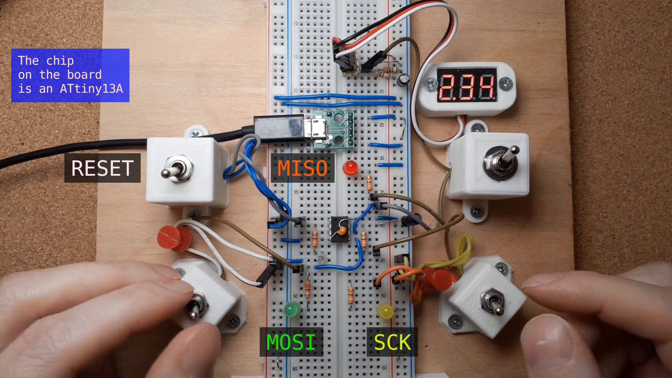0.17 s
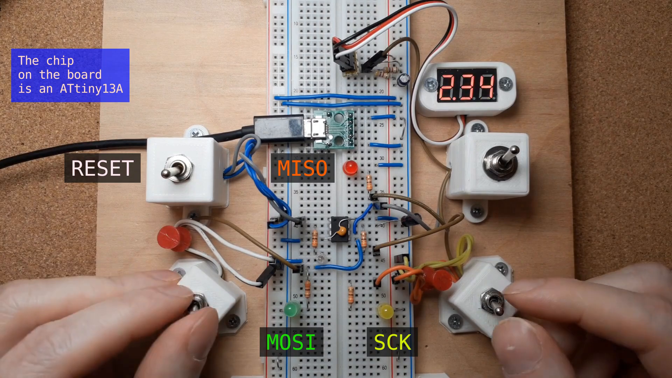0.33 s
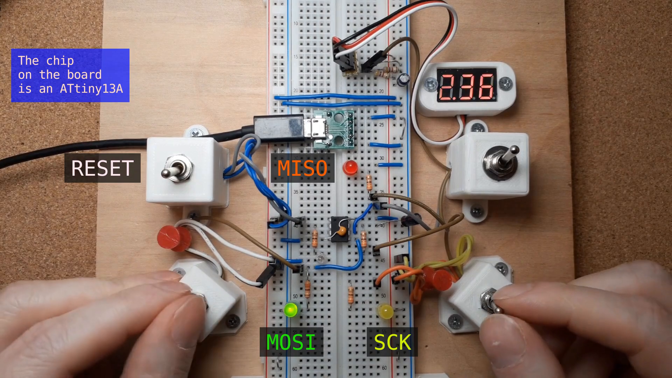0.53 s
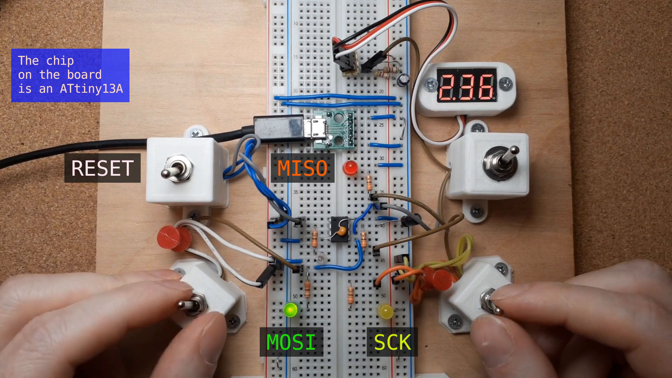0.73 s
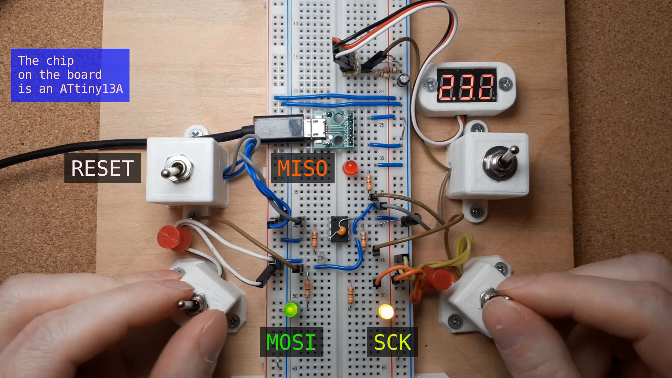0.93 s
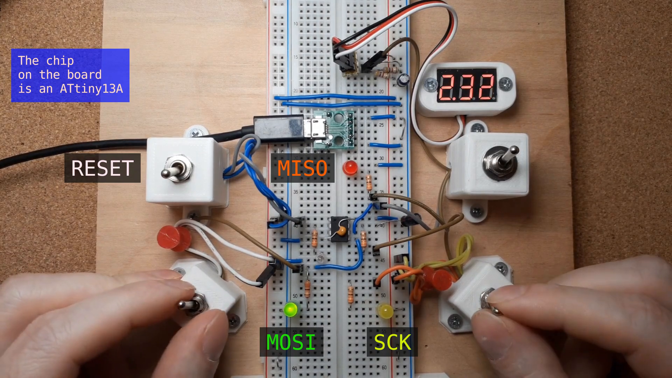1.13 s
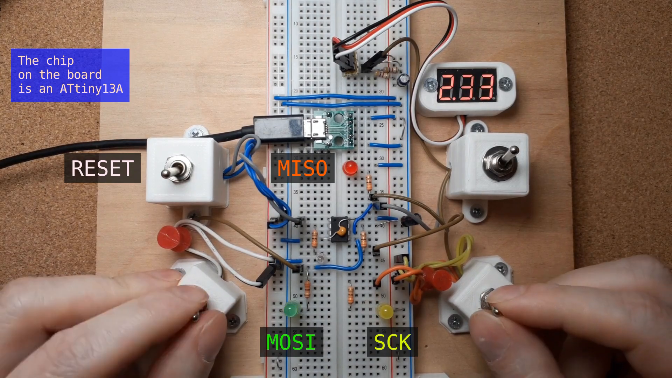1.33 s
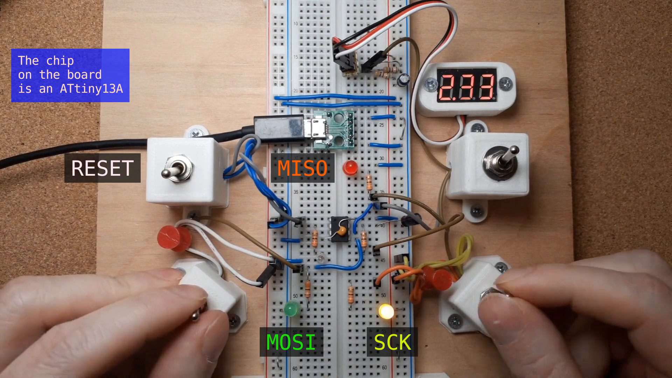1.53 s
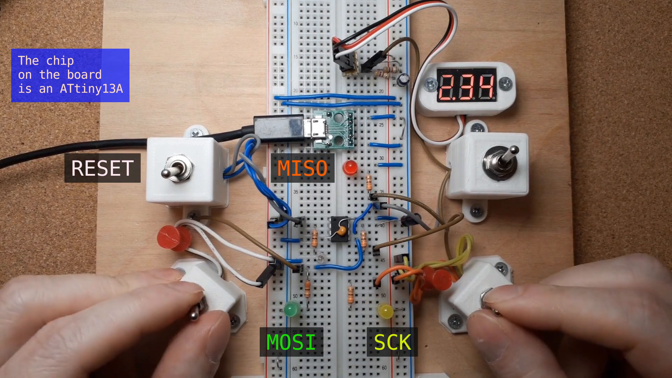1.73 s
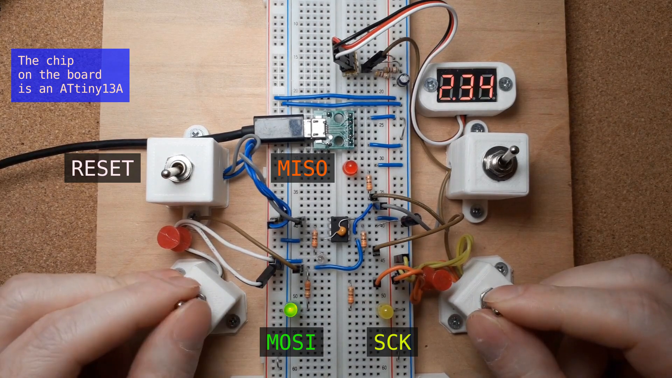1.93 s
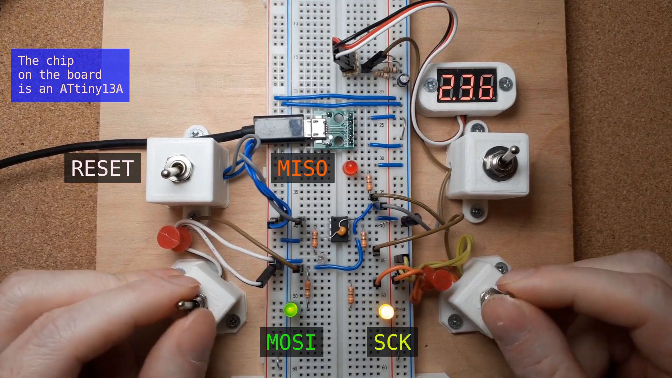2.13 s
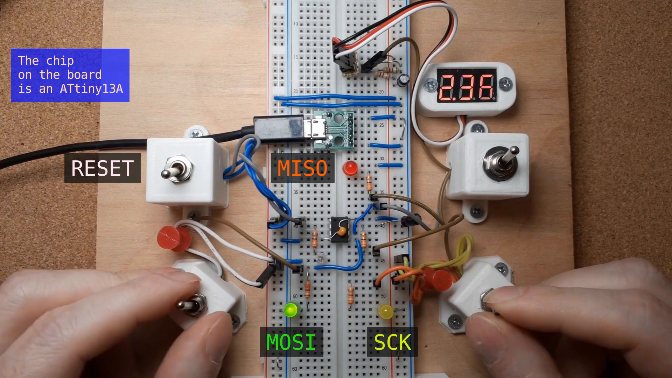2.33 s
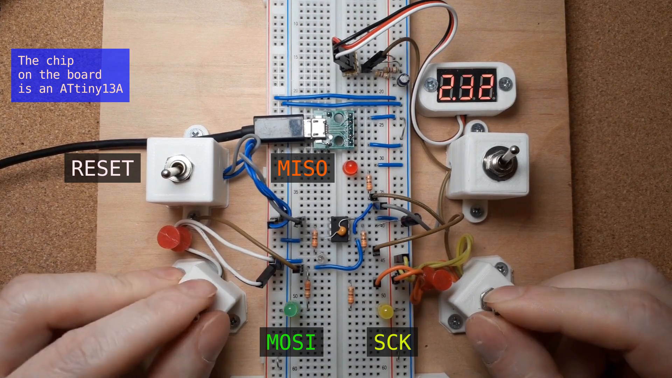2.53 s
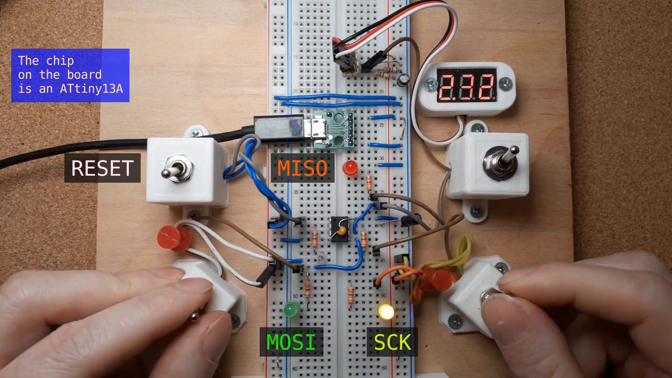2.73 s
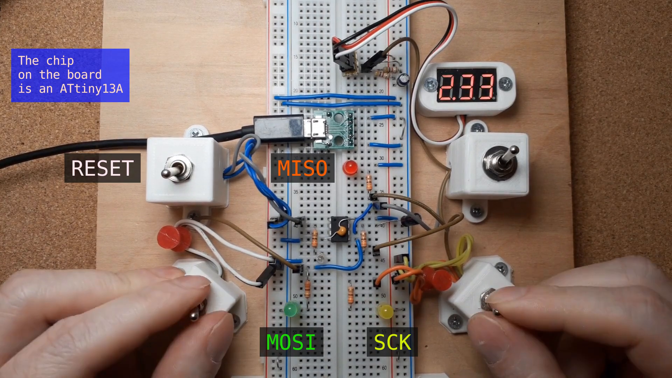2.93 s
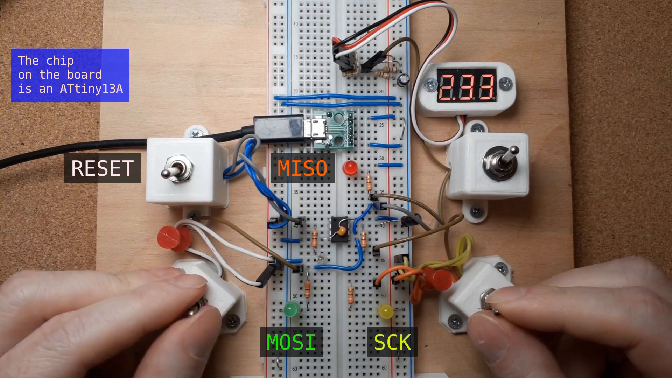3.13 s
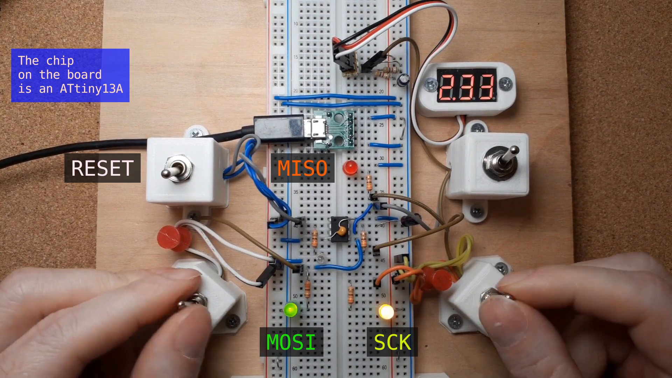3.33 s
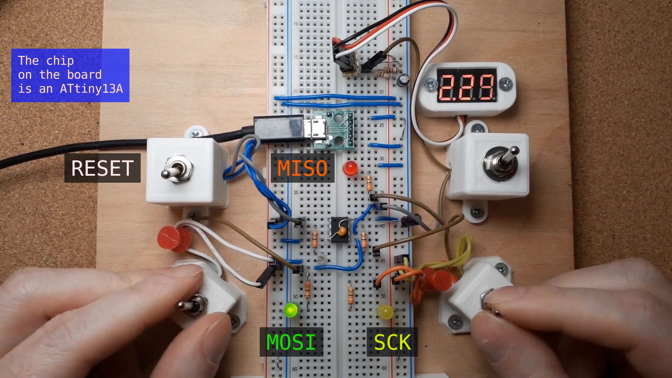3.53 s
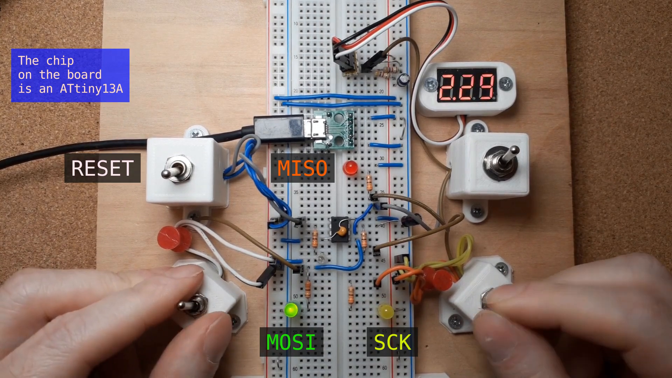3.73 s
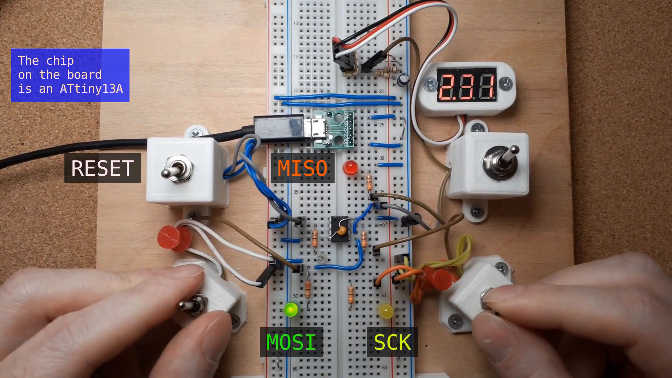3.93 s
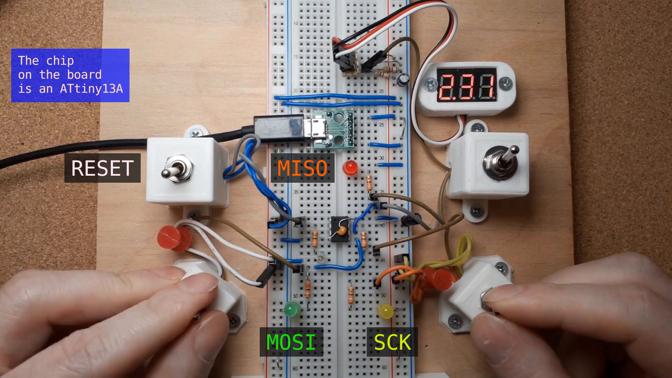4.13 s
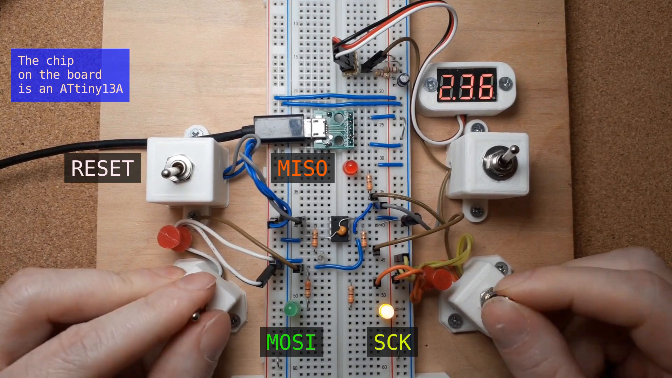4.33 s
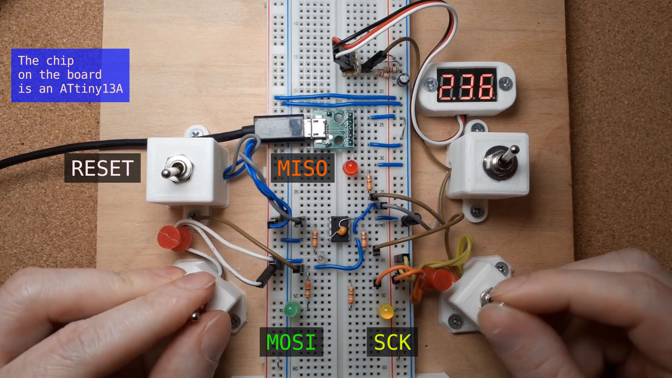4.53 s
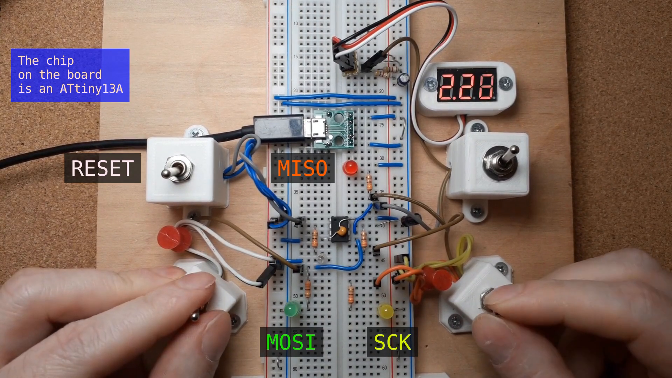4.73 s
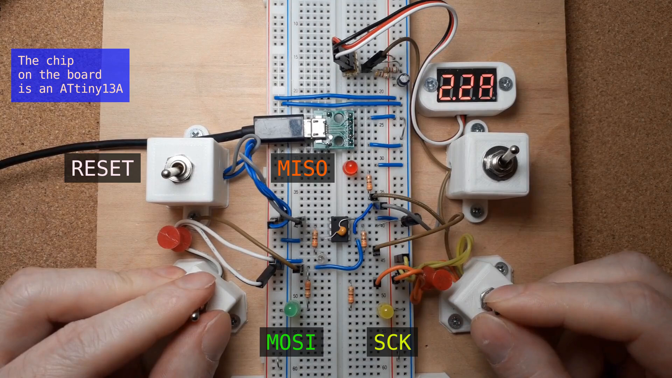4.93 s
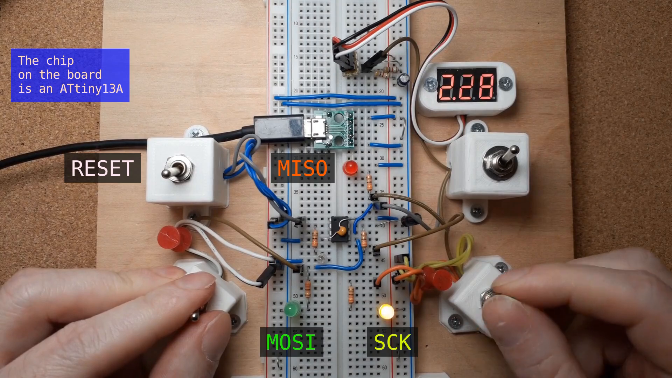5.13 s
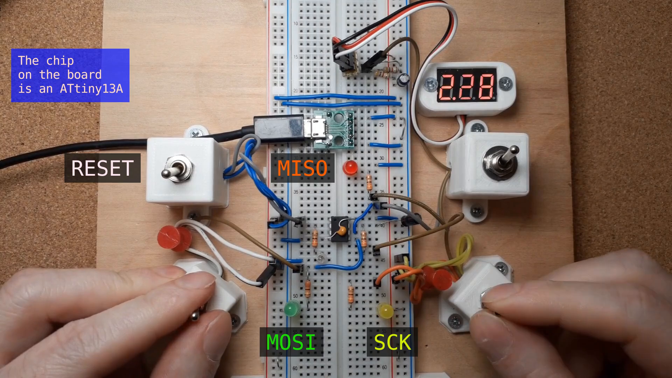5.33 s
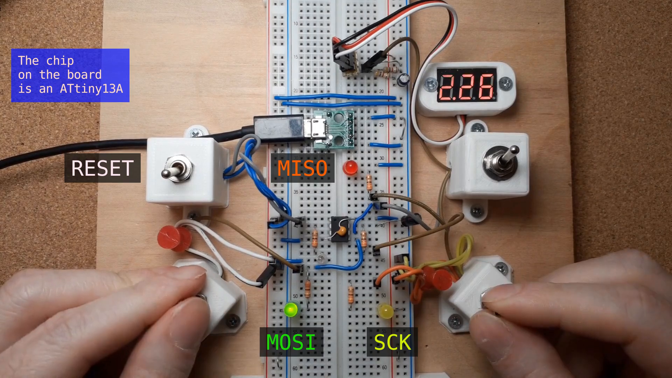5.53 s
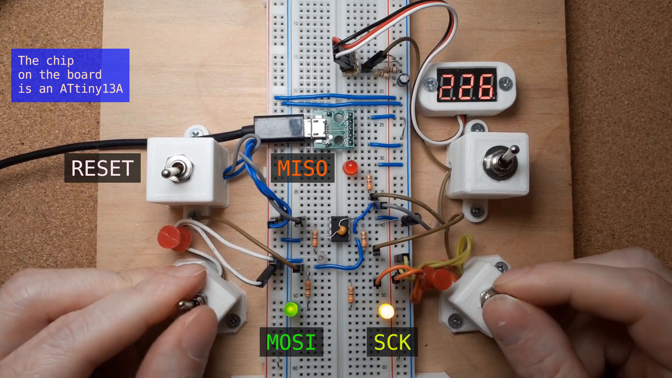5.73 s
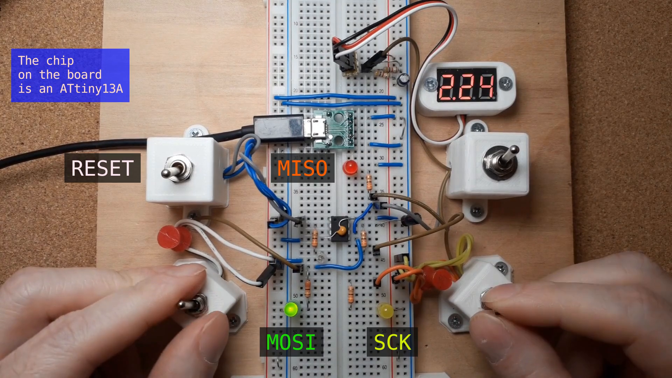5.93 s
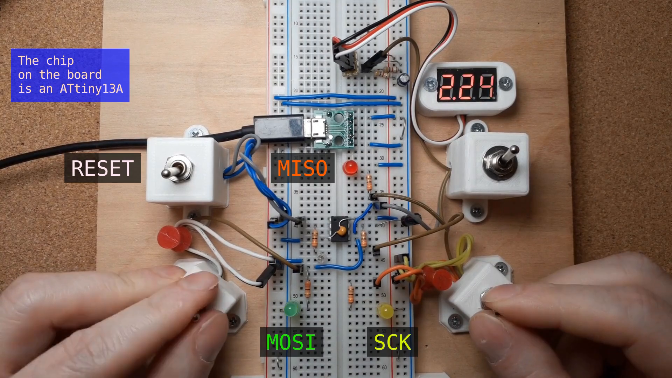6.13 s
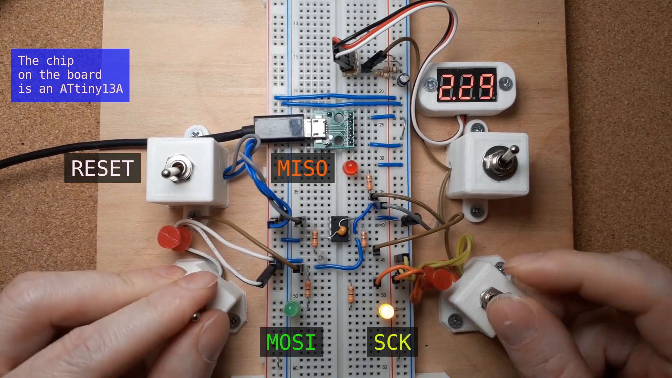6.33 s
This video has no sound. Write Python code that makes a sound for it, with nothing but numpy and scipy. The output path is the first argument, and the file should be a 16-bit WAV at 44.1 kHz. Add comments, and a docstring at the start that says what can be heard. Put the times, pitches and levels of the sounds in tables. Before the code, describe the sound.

Two small toggle switches flipped by hand in quick runs, with sharp close clicks, soft wooden thumps and faint finger rubs.

```python
"""Two small toggle switches in plastic boxes on a wooden board, close to a stereo microphone.
Hiss and a faint fan fade in, and a finger ticks and rubs on a lever. From 0.5 s the switches are flipped
in quick runs: each time the plunger scrapes, the contact snaps over and the lever hits its stop, then
box and springs ring, the board thumps, the bench sways and a small dry room answers. Fingers tick and
rub between the flips; the last flip lands at 6.2 s, and one short rub follows it."""
import sys
import numpy as np
from scipy import signal
from scipy.fft import rfft, irfft
from scipy.io import wavfile

SR = 44100
rng = np.random.default_rng(int(sys.argv[2]) if len(sys.argv) > 2 else 0)


def transcribe(signal):
    """Save signal, clipped to [-1, 1], as a 16-bit WAV file at the path in sys.argv[1]."""
    frames = np.atleast_2d(signal).T
    limited = np.clip(frames, -1, 1)
    pcm = np.round(limited * 32767).astype(np.int16)
    wavfile.write(sys.argv[1], SR, pcm)


N = 281799

# colour of the room tone: (frequency [Hz], relative level [dB])
HISS_COLOUR = [(30, 21.5), (100, 13), (250, 10.5), (500, 6.5), (1000, 3), (2000, -3), (5000, -7),
               (10000, -7), (16000, -11.5)]
# the fan's hum, as peaks in the room tone: (frequency [Hz], width [Hz], lift [dB])
FAN_HUM = [(122, 33, 21), (265, 36, 8), (324, 17, 10), (764, 40, 6.5), (1606, 64, 9.4)]
# the fan's whine: (frequency [Hz], level [dB])
FAN_WHINE = [(257, -72), (763, -80.5), (1604, -85.5)]
# length of the room's tail: (frequency [Hz], t60 [s])
ROOM_DECAY = [(80, 0.07), (200, 0.05), (400, 0.09), (1300, 0.135), (2200, 0.135), (5000, 0.1365),
              (14000, 0.08)]
# colour of the room's tail: (frequency [Hz], level [dB])
ROOM_COLOUR = [(80, -6.5), (200, -12), (400, -8.5), (1300, -21), (2200, -21), (5000, -22.5), (11000, -18.5),
               (15000, -18.5)]
# rumble of the hands on the board: (frequency [Hz], relative level [dB])
HAND_RUMBLE = [(20, 0.5), (40, 0.5), (85, 0), (130, -12), (250, -26), (700, -45.5)]
# colour of sliding skin: (frequency [Hz], relative level [dB])
SKIN_COLOUR = [(100, -10.5), (300, -2), (800, -1.5), (1400, 3), (2500, -2.5), (5000, -9.5), (9000, -17),
               (15000, -27)]
# skin rubs over lever and box: (centre time [s], half length [s], level [dB], softness [dB/octave])
RUBS = [(.168, 0.0026, -66.5, 0), (0.296, 0.012, -53.5, 11), (0.802, 0.12, -66, 4), (0.891, 0.042, -53, 3),
        (2.895, 0.12, -65.5, 2), (3.221, .016, -52.5, -3), (3.386, 0.024, -52, 4), (3.773, 0.017, -47, 4.5),
        (6.38, 0.0096, -47, -2.5)]
# EQ that turns a full flip into a light tick: (frequency [Hz], gain [dB])
TICK_EQ = [(150, 6.5), (400, 6), (900, 4.5), (2000, -1), (4500, -3.5), (9000, -6.5), (15000, -11.5)]
# a finger lands on a lever and takes up its play: (time [s], gain [dB], softness [dB/octave])
LANDINGS = [(.402, -32.5, -1.5), (0.438, -38, -1), (0.4702, -20, -2.5), (0.6823, -46.5, 6.5),
            (.9103, -28.5, -1), (1.028, -38, 3.5), (1.3112, -38.5, 0.5), (1.572, -40.5, 5.5),
            (1.9912, -26, 0.5), (2.1747, -35, 2), (2.2796, -37, 2.5), (2.52, -37.5, 0),
            (2.7483, -36.5, 1.5), (3.0998, -32.5, 2), (3.2111, -23.5, 1), (3.4931, -20.5, 3.5),
            (3.6608, -29.5, -2.5), (4.064, -30.5, 0.5), (4.4246, -33.5, -0.5), (4.7386, -32, -1.5),
            (5.1221, -28, -1.5), (5.2589, -31, -2.5), (5.5441, -34.5, 4), (5.564, -29.5, -1),
            (5.8887, -30, 0.5), (6.18, -34, 0)]
# the rocker catches on its way to "on", rows left, right: (lead [s], gain [dB], softness [dB/octave])
ROCKER_CATCHES = [(.008, -14.5, -1), (.02, -32, 0.5)]
# the board's bounce, rows left on, left off, right on, right off:
# (mid pitch [Hz], rise [s], pitch drop [share of mid pitch], delay [s])
BOARD_BOUNCES = [(121, 0.004, 0.52, 0.0012), (141, .0028, .9, 0.00081), (101, 0.0037, 0.31, 0.0013),
                 (109, 0.0041, 0.39, .0008)]
# where the board's hollow knock sits: (frequency [Hz], weight of the knock gain [factor])
KNOCK_BAND = [(400, 1.5), (1600, 0)]
# ring of springs and metal frames: (frequency [Hz], half width [Hz], gain [dB], t60 [s])
SPRING_MODES = [(4300, 500, -26, .09), (6960, 450, -23.5, .1), (11200, 700, -17, 0.1)]
# resonances of each switch in its box: (frequency [Hz], undamped width [Hz], lift [dB])
LEFT_BOX = [(850, 420, 9.5), (1360, 130.0, 3.5), (2536, 410.0, -1.5), (2800, 76, -1.5), (3120, 260, 4.5),
            (3500, 210, 0.5), (4150, 520, 8), (4830, 500, 5), (5920, 390, 3), (6300, 1100, 4),
            (7430, 200.0, 2), (7900, 150, 2.5), (9640, 410, 4.5), (11433, 2100, 5), (12992, 310.0, 0.8),
            (14000, 320.0, 3)]
RIGHT_BOX = [(858, 200, 6), (1151, 88, 11.4), (1390, 160, 4.4), (1800, 210, 8.7), (2150, 450, 5.94),
             (2420, 170, 8.7), (3350, 400, 11.46), (4090, 360, 6.8), (5500, 150, 2.0), (6200, 560, 2.5),
             (6970, 480, 3.4), (9900, 300, 2.4), (11000, 980, 5.4), (15200, 1380.0, 11)]
# stereo placement: (frequency [Hz], left switch L-R [dB], right switch L-R [dB])
SWITCH_PAN = [(300, 5.5, -5), (1490, 2, -1), (3500, -1.5, 1.5), (7000, 7.5, -4.5), (14000, 3.5, -2)]
# colour of each throw: (frequency [Hz], left on [dB], left off [dB], right on [dB], right off [dB])
THROW_COLOURS = [(197, 21.5, 20, 13.5, 15), (352, 7, 15.5, -2, 7.5), (526, 3, 2.5, -2, 4),
                 (1035, 5, 6, -5, -8), (1340, 13, 18.0, 6.5, 7), (2200.0, 7, 14.5, 4, 1),
                 (3530, 9.5, 10, 2, -2.5), (5340, 8.5, 9.5, 8.5, 3), (7680, 5.5, 14, 11, 10.5),
                 (9560, -0.3, -0.5, 1.5, 1), (12100, 0.15, 6, 4.5, 4), (15500.0, -4.5, 4.5, -6.5, -7.5)]
# cue list of flips: (time [s], switch [0 left, 1 right], throw [0 on, 1 off], snap to stop [ms],
# stop over snap in the metal [dB], click gain [dB], brightness [dB/octave], ringing pitch [Hz],
# knock gain [dB], thump level [dB])
FLIP_CUES = [(0.5187, 0, 0, 2.73, 3, -1.5, 0.04, 3170, -3, -23),
             (0.9466, 1, 0, 2.22, -2.5, -3, 0.5, 1660, 3.5, -21.5),
             (1.1056, 1, 1, 3.32, 3.5, -4.5, .2, 1720, -2, -20),
             (1.423, 0, 1, 1, 13.5, -0.8, 1.5, 1772, 1.5, -22.5),
             (1.6056, 1, 0, 2.65, 1.5, -4, .6, 2220, 3.5, -21.5),
             (1.7554, 1, 1, 2.82, -2, -2.5, 0.16, 1510, 0, -19),
             (2.03, 0, 0, 1.99, 11, -1.1, 1.5, 2280, 6, -24.5),
             (2.2161, 1, 0, 3.2, -17.5, -1.5, 0, 1750, -1, -24),
             (2.3376, 1, 1, 1.13, 2, 1.35, .6, 1950, -1, -24),
             (2.5995, 0, 1, 0.38, -4.5, -0.75, 0.5, 3770, 0, -27),
             (2.79, 1, 0, 0.75, 16, 4.5, -1.54, 4270, -9.5, -24),
             (2.9538, 1, 1, 1.06, 2, 4.5, -1.53, 2670, -5.5, -23),
             (3.2484, 0, 0, 2.62, -1.5, -1.5, -0.1, 2662, -1, -19.5),
             (3.4204, 1, 0, 2.6, -1, -5.5, 1.8, 2020, 9, -21.5),
             (3.5366, 1, 1, 1.83, -2.5, -1.6, 1, 1270, 0.5, -20.5),
             (3.698, 1, 0, 3.16, -8, -6, 1, 3960, 5, -25.5),
             (3.8268, 1, 1, 3.2, 4, -3.5, 0.8, 1790, 4.5, -17.5),
             (4.14, 0, 1, 1.4, -1.5, 0.85, -0.24, 1566, -4.5, -24),
             (4.341, 1, 0, .97, -19.5, -0.55, 1, 1830, 7, -23),
             (4.474, 1, 1, 2.94, -26.5, -1.4, 0.6, 1660, 2, -18.5),
             (4.6352, 1, 0, 3, -38, -0.5, 1.1, 1890, 0, -24),
             (4.7837, 1, 1, 3.24, 3, -1.3, -0.5, 1507, .5, -17),
             (5.1619, 1, 0, 1.29, 0, 4.5, -0.56, 2406, -4.5, -23.5),
             (5.301, 1, 1, 2.86, 0, -2.5, -0.1, 3020, 1.5, -19),
             (5.6085, 0, 0, 2.6, 13.5, 0.3, 1, 1220, 2, -18),
             (5.7931, 1, 0, 0.96, -22.5, 2.5, 1.44, 1884, 4, -24),
             (5.9602, 1, 1, 1.55, -1.5, -2.1, 0.06, 3487, -1, -22),
             (6.2176, 0, 1, 0.84, 0, 0, -0.25, 1240, -2.5, -23.5)]
# master fader: (time [s], gain [dB])
FADER = [(0, -10.5), (.2, -1.5), (.45, 0.5)]

CLICK_SAMPLES, PREROLL_SAMPLES = 4096, 256
PREROLL_S = PREROLL_SAMPLES / SR
CLICK_HZ, SCENE_HZ = np.fft.rfftfreq(CLICK_SAMPLES, 1 / SR), np.fft.rfftfreq(N, 1 / SR)
TIME_S = np.arange(N) / SR
LEFT_VS_RIGHT = np.array([[1], [-1]])


def amp(db):
    """Decibels as a gain factor."""
    return 10 ** (np.asarray(db) / 20)


def unit_rms(x):
    """The signal brought to an RMS of one."""
    return x / np.sqrt(np.mean(x ** 2) + 1e-20)


def contour(table, hz, column=1):
    """One column of a table, drawn along a log-frequency axis."""
    columns = np.transpose(table)
    return np.interp(np.log(hz + 1), np.log(columns[0] + 1), columns[column])


def peaks(modes, hz):
    """Lift in dB from a set of resonances."""
    return sum(db / (1 + (2 * (hz - f) / width) ** 2) for f, width, db in modes)


def octaves(hz, pivot_hz):
    """Octaves from the pivot of a tilt EQ, held flat in the bass."""
    return np.log2(np.maximum(hz, 250) / pivot_hz)


def minimum_phase(db):
    """An EQ that rings only after the blow."""
    log_gain = np.log(amp(np.r_[db, db[-2:0:-1]]))
    return np.exp(np.conj(signal.hilbert(log_gain))[:len(db)])


def add(mix, s, sound):
    """Lay a sound into the mix at s seconds."""
    part = mix[:, max(round(s * SR), 0):][:, :sound.shape[-1]]
    part += sound[..., :part.shape[1]]


def noise(colour_db, shared):
    """Coloured stereo noise, with a share of its power common to both sides."""
    centre, *sides = rng.standard_normal((3, N))
    white = shared ** .5 * centre + (1 - shared) ** .5 * np.array(sides)
    return unit_rms(irfft(rfft(white) * amp(colour_db), N))


def drift(cutoff_hz):
    """A slow random wobble."""
    return unit_rms(irfft(rfft(rng.standard_normal(N)) * np.exp(-(SCENE_HZ / cutoff_hz) ** 2), N))


def room_tone(hiss_db=-63.5):
    """Microphone hiss and a faint fan, whose speed wavers a little."""
    fan_s = np.cumsum(1 + 0.0024 * drift(cutoff_hz=5)) / SR
    whine = sum(amp(db) * np.sin(2 * np.pi * (hz * fan_s + 0.17 * rng.random((2, 1))))
                for hz, db in FAN_WHINE)
    colour_db = contour(HISS_COLOUR, SCENE_HZ) + peaks(FAN_HUM, SCENE_HZ)
    return amp(hiss_db) * noise(colour_db, shared=0.12) + whine


def room_reverb(send, predelay_s=0.0056):
    """Dense echoes from the bench and near walls, each band dying at its own speed."""
    hz, t, bands = signal.stft(rng.standard_normal((2, SR // 2)), SR, nperseg=256)
    t60 = contour(ROOM_DECAY, hz)[:, None]
    gain = amp(contour(ROOM_COLOUR, hz)[:, None]) * np.sqrt(2 * np.log(1000) / t60 / SR)
    tail = signal.istft(bands * gain * amp(-60 * t / t60), SR, nperseg=256)[1]
    tail = np.pad(tail, ((0, 0), (round(predelay_s * SR), 0)))
    return signal.fftconvolve(send, tail, axes=1)[:, :N]


def flip_envelope(levels_db, build_s, decay_s):
    """An envelope that swells into each flip and dies away after it."""
    t = TIME_S[::64]
    since = t - np.array(FLIP_CUES)[:, :1]
    swells = amp(levels_db) * np.exp(-abs(since) / np.where(since < 0, build_s, decay_s))
    return np.interp(TIME_S, t, np.sqrt(np.sum(swells ** 2, 0)))


def bench_sway(pitch_hz=21.1, db=-32.5):
    """Every flip feeds the sub-bass sway of the bench."""
    cycles = np.cumsum(pitch_hz * (1 + 0.064 * drift(cutoff_hz=6))) / SR + .025 * LEFT_VS_RIGHT
    return flip_envelope(db, build_s=0.03, decay_s=0.46) * np.sin(2 * np.pi * cycles)


def hand_tremble(rest_db=-63.5, settle_s=0.53, over_thump_db=-22.5):
    """Hands rumble as they rest on the board, and tremble most around a heavy thump."""
    resting = amp(rest_db) * np.minimum(TIME_S / settle_s, 1) ** 2
    thumps_db = np.array(FLIP_CUES)[:, -1:]
    pressing = flip_envelope(thumps_db + over_thump_db, build_s=0.054, decay_s=.08)
    return np.hypot(resting, pressing) * noise(contour(HAND_RUMBLE, SCENE_HZ), shared=0.76)


def skin_rub(mix, s, half_s, db, soft_db, catches_per_s=900, catch_decay_s=0.0018):
    """Skin slips in tiny random catches, swelling and fading around s."""
    count = 2 ** 14
    hz, t = np.fft.rfftfreq(count, 1 / SR), (np.arange(count) - count // 2) / SR
    catches = rng.random(count) < catches_per_s / SR
    strength = amp(2.7 * np.minimum(rng.exponential(1, count), 4))
    power = signal.lfilter([1], [1, -np.exp(-1 / (catch_decay_s * SR))], (catches * strength) ** 2)
    grain = np.sqrt(power) * rng.standard_normal((2, count))
    colour_db = contour(SKIN_COLOUR, hz) - soft_db * octaves(hz, pivot_hz=2000)
    friction = unit_rms(irfft(rfft(grain) * amp(colour_db)))
    add(mix, s + t[0], amp(db) * np.exp(-(t / half_s) ** 2) * friction)


def lever_tick(mix, s, switch, db, soft_db):
    """One light blow rings the switch; a soft fingertip sounds darker than a nail."""
    average_db = np.mean([contour(THROW_COLOURS, CLICK_HZ, column) for column in range(1, 5)], 0)
    colour_db = db + average_db + contour(TICK_EQ, CLICK_HZ) - soft_db * octaves(CLICK_HZ, pivot_hz=2000)
    grain = rng.standard_normal((2, CLICK_SAMPLES))
    add(mix, s - PREROLL_S, switch_click(switch, grain, [(0.0031, 0)], colour_db))


def fingers(press_s=0.044, slip_delay_s=0.0035):
    """A finger lands on the next lever, slips and presses; going to "on", the rocker catches once."""
    mix = np.zeros((2, N))
    for s, switch, throw, *_ in FLIP_CUES:
        # two faint ticks under the pressing finger
        for lead, accent in zip(rng.random(size=2), rng.standard_normal(size=2)):
            lever_tick(mix, s - press_s * lead, switch, db=-44.5 + 2 * accent, soft_db=2.5)
        if throw == 0:
            lead_s, db, soft_db = ROCKER_CATCHES[switch]
            lever_tick(mix, s - lead_s, switch, db, soft_db)
    for s, db, soft_db in LANDINGS:
        switch = next(side for flip_s, side, *_ in FLIP_CUES if flip_s > s)
        lever_tick(mix, s, switch, db, soft_db)
        skin_rub(mix, s + slip_delay_s, half_s=.016, db=db - 29.5, soft_db=soft_db + 2.5)
    for rub in RUBS:
        skin_rub(mix, *rub)
    return mix


def thump(hz, rise_s, sag):
    """A few low cycles, sinking in pitch as the finger settles."""
    t = np.arange(CLICK_SAMPLES) / SR
    pitch_hz = hz * (1 + sag * (np.exp(-t / rise_s / 2) - .5))
    envelope = t / rise_s * np.exp(1 - t / rise_s)
    return envelope * np.sin(2 * np.pi * np.cumsum(pitch_hz) / SR)


def board_bounce(switch, throw, rock_s=0.0011, lean_db=(0.6, -1.3)):
    """The board is pushed one way by "on", the other by "off"; a softer swing of the bench follows."""
    pitch_hz, rise_s, sag, delay_s = BOARD_BOUNCES[2 * switch + throw]
    motion = thump(pitch_hz, rise_s, sag) + amp(-22.5) * thump(hz=95, rise_s=0.016, sag=0.22)
    # the board rocks too, so the far side moves later and less
    lag_s = delay_s + rock_s * np.array([[switch], [1 - switch]])
    rocked = irfft(rfft(motion) * np.exp(-2j * np.pi * CLICK_HZ * lag_s))
    return (-1) ** throw * amp(lean_db[switch] * LEFT_VS_RIGHT) * rocked


def spring_ring(clicks):
    """Springs and metal frames ring on after the crack, in clusters of close modes."""
    count = 2 ** 13
    t, hz = np.arange(count) / SR, np.fft.rfftfreq(count, 1 / SR)
    ring = 0
    for centre_hz, width_hz, db, t60 in SPRING_MODES:
        band = np.exp(-((hz - centre_hz) / width_hz) ** 2)
        cluster = irfft(rfft(rng.standard_normal((2, count))) * band)
        ring = ring + amp(db - 60 * t / t60) * np.sqrt(2 * np.log(1000) / t60 / SR) * cluster
    return signal.fftconvolve(clicks, ring, axes=1)[:, :N]


def box_resonance(switch, damping_hz=70):
    """The box's peaks in dB, each widened by the damping of the hand that rests on it."""
    modes = [LEFT_BOX, RIGHT_BOX][switch]
    return peaks([(hz, width + damping_hz, db) for hz, width, db in modes], CLICK_HZ)


def impact_spectrum(grain, blows, rise_ms, ring_ms, ring_db, scrape_ms, flatten_hz):
    """Blows (time [ms], level [dB]) on dense modes: a scrape swells into each crack, a ring follows."""
    crack_ms, scrape_db = 0.46, -7.5
    ms = (np.arange(CLICK_SAMPLES) - PREROLL_SAMPLES) / SR * 1000
    power = 0
    for at_ms, db in blows:
        before, away_ms = ms < at_ms, abs(ms - at_ms)
        crack = np.exp(-away_ms / np.where(before, rise_ms, crack_ms))
        scrape = amp(scrape_db) ** 2 * np.exp(-away_ms / scrape_ms)
        ring = amp(ring_db) ** 2 * np.exp(-away_ms / ring_ms)
        power = power + amp(db) ** 2 * (crack + np.where(before, scrape, ring))
    spectrum = rfft(grain * np.sqrt(power))
    # flatten the broad colour and keep the fine grain
    offset_hz = np.arange(-CLICK_SAMPLES // 16, CLICK_SAMPLES // 16 + 1) * SR / CLICK_SAMPLES
    window = np.exp(-(offset_hz / flatten_hz) ** 2)
    broad_power = signal.convolve(abs(spectrum) ** 2, window[None] / window.sum(), "same", "direct")
    return spectrum / np.sqrt(broad_power + 1e-20)


def switch_click(switch, grain, blows, colour_db, knock_top_hz=650, box_top_hz=2600, low_cut_hz=170):
    """Metal parts crack, the box rings a little later and longer, the board knocks on the last blow."""
    hz = CLICK_HZ
    metal = impact_spectrum(grain, blows, rise_ms=0.26, ring_ms=1.2, ring_db=-10.5,
                            scrape_ms=0.52, flatten_hz=410)
    box_blows = [(at_ms + 0.55, db + 5.5 * k) for k, (at_ms, db) in enumerate(blows)]
    box = impact_spectrum(grain, box_blows, rise_ms=0.21, ring_ms=1.7, ring_db=-8.0,
                          scrape_ms=0.94, flatten_hz=236)
    knock_s = PREROLL_S + blows[-1][0] / 1000
    board_db = peaks([(267, 140, 1.0), (594, 100, 0.91)], hz) - 1.5
    knock = np.exp(-2j * np.pi * hz * knock_s) * minimum_phase(board_db)
    # crossovers: board in the lows, box in the mids, metal on top
    above_knock = 1 / (1 + (knock_top_hz / (hz + 1)) ** 6)
    above_box = 1 / (1 + (box_top_hz / (hz + 1)) ** 6)
    upper = np.sqrt(1 - above_box) * 1j * box + np.sqrt(above_box) * metal
    click = np.sqrt(1 - above_knock) * knock + np.sqrt(above_knock) * upper
    low_cut_db = 10 * np.log10(1 + (low_cut_hz / (hz + 10)) ** 4)
    click = click * minimum_phase(colour_db + box_resonance(switch) - low_cut_db)
    pan = amp(contour(SWITCH_PAN, hz, column=switch + 1) * LEFT_VS_RIGHT / 2)
    pan = pan / np.sqrt(np.mean(pan ** 2, 0))
    lead_s = [.0003, -.00025][switch] * LEFT_VS_RIGHT / 2  # the nearer side hears it first
    return irfft(click * pan * np.exp(2j * np.pi * hz * lead_s))


def flips(kept_grain=0.42, ring_width_hz=240, ring_db=5, scrape_lead_s=0.0056, scrape_db=-30):
    """Scrape, snap, stop and thump of every flip, as a direct signal and a room send."""
    direct, send = np.zeros((2, 2, N))
    send_db = (0.8, 1.5, 0.5, 0.5)  # left on, left off, right on, right off
    throw_grains = rng.standard_normal((4, 2, CLICK_SAMPLES))
    for s, switch, throw, gap_ms, stop_db, db, bright_db, ring_hz, knock_db, thump_db in FLIP_CUES:
        kind, start_s = 2 * switch + throw, s - PREROLL_S
        # each throw keeps part of its character from flip to flip
        fresh_grain = rng.standard_normal((2, CLICK_SAMPLES))
        grain = kept_grain ** .5 * throw_grains[kind] + (1 - kept_grain) ** .5 * fresh_grain
        colour_db = (db + contour(THROW_COLOURS, CLICK_HZ, column=1 + kind)
                     + bright_db * octaves(CLICK_HZ, pivot_hz=3000)
                     + knock_db * contour(KNOCK_BAND, CLICK_HZ)
                     + peaks([(ring_hz, ring_width_hz, ring_db)], CLICK_HZ))
        click = switch_click(switch, grain, [(0, 0), (gap_ms, stop_db)], colour_db)
        add(direct, start_s, click)
        add(send, start_s, amp(send_db[kind]) * click)
        # the plunger scrapes over the rocker in three slips just before it tips
        scrape_grain = rng.standard_normal((2, CLICK_SAMPLES))
        scrape = switch_click(switch, scrape_grain, [(0, -4), (2.5, -2), (5, 0)], colour_db + scrape_db)
        add(direct, start_s - scrape_lead_s, scrape)
        for mix in direct, send:
            add(mix, s, amp(thump_db) * board_bounce(switch, throw))
    return direct, send


def scene():
    """Switches and fingers up front, over the small room, the low rumble and the room tone."""
    switches, send = flips()
    handling = fingers()
    foreground = switches + spring_ring(switches) + handling
    return foreground + room_reverb(send + handling) + bench_sway() + hand_tremble() + room_tone()


def record(dry, high_cut_hz=16200):
    """A short fade-in, a hard clip at full scale, then a steep high cut."""
    fader_db = np.interp(TIME_S, *np.transpose(FADER))
    clipped = np.clip(dry * amp(fader_db), -1, 1)
    high_cut = signal.firwin(255, high_cut_hz, window=("kaiser", 8), fs=SR)
    return signal.oaconvolve(clipped, high_cut[None], "same")


dry = scene()
out = record(dry)
transcribe(out)
```